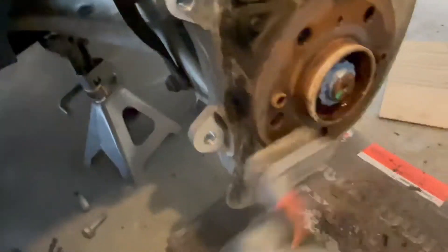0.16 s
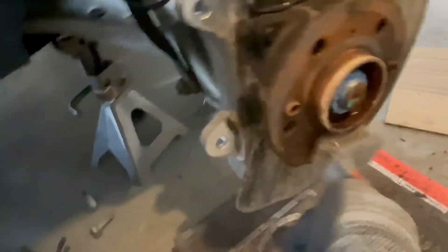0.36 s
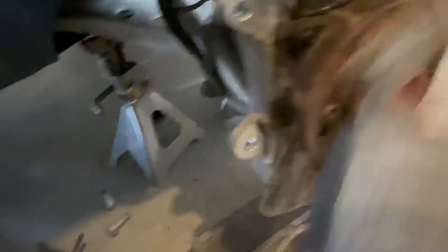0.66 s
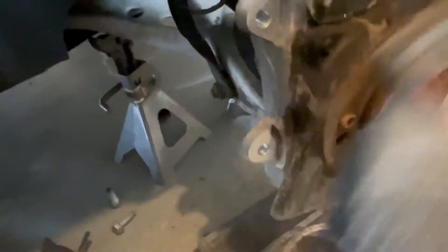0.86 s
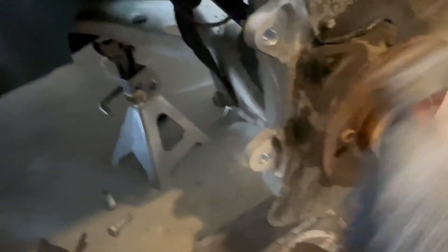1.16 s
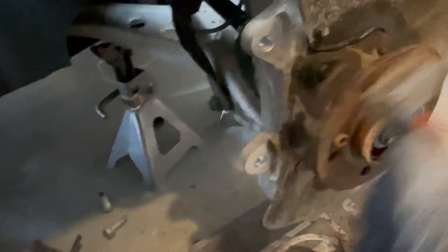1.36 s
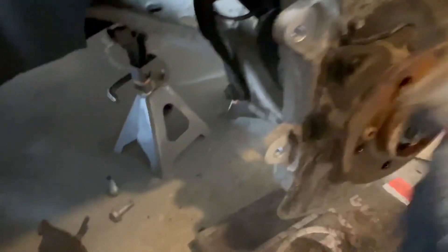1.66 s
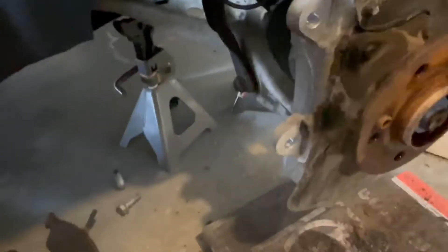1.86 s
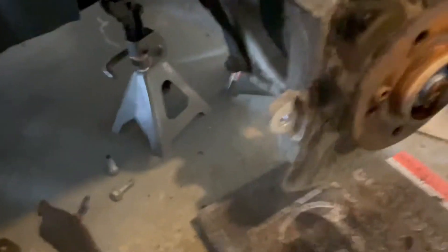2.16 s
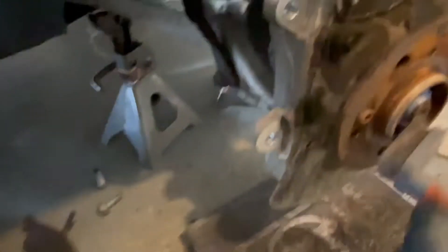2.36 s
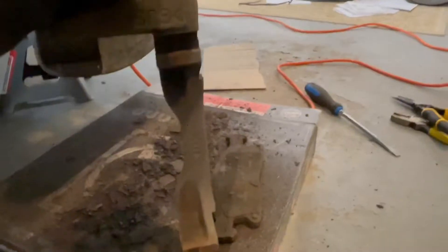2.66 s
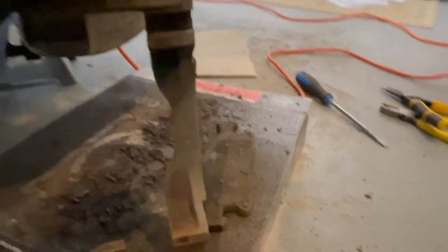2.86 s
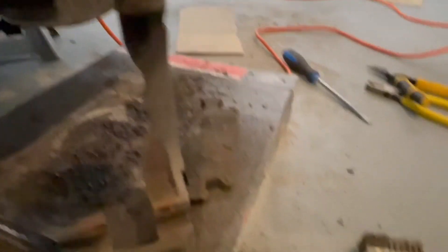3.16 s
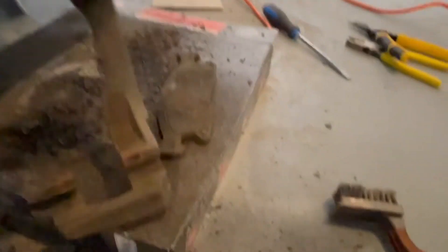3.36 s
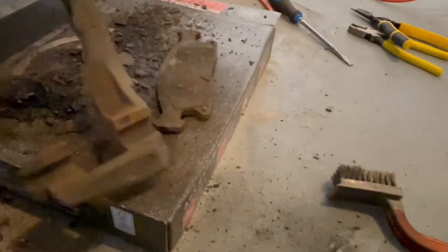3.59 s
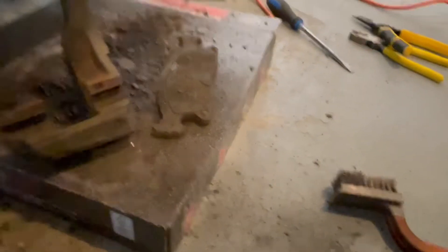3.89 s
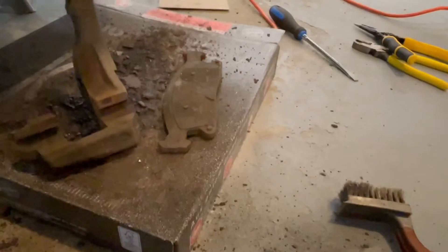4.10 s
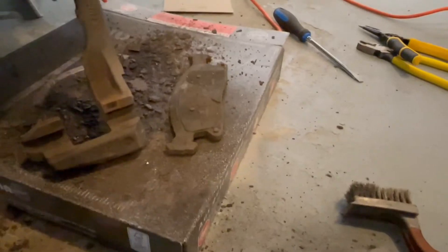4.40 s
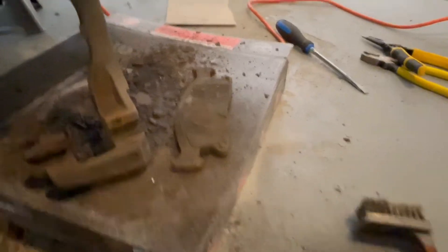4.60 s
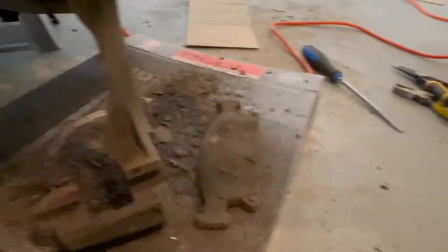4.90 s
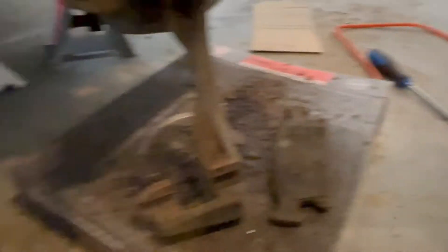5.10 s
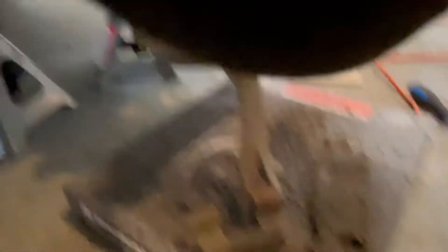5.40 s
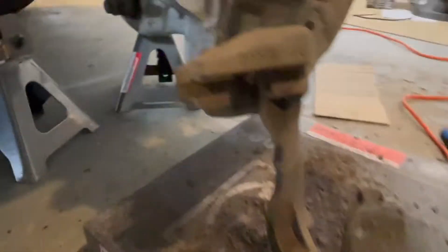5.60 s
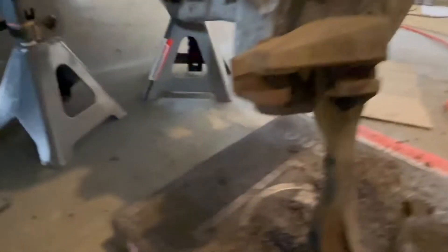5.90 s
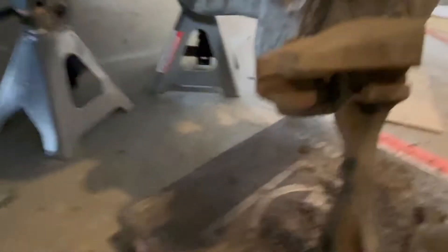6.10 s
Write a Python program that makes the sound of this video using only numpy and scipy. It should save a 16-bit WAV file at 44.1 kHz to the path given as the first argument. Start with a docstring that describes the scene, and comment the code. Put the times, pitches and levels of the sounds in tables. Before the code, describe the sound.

Fast bristly scrubbing makes rusty metal sing thinly, then a sudden cut to iron clattering, dragging and thudding over a hollow box in a garage.

```python
"""A garage: a wire brush scrubs a rusty wheel hub in quick strokes, and the hub sings in thin high modes.
At 2.478 s we are at once closer to the floor: an iron bracket clatters, drags and clunks on a gritty box.
Brush and grit are shaped noise with uneven clicks; hub, box and bracket are sums of decaying modes.
Both spots are heard in stereo over the low rumble and hum of the building."""
import sys
import numpy as np
from scipy import signal
from scipy.fft import rfft, irfft, next_fast_len
from scipy.io import wavfile
from scipy.ndimage import uniform_filter1d

SR = 44100
rng = np.random.default_rng(int(sys.argv[2]) if len(sys.argv) > 2 else 0)


def wav_out(sig):
    """Save sig, one row per channel (or a flat mono array), as 16-bit PCM at SR to the path in sys.argv[1]."""
    wavfile.write(sys.argv[1], SR, np.round(np.clip(np.atleast_2d(sig).T, -1, 1) * 32767).astype(np.int16))


N = 275624
PAD = next_fast_len(N, True)
T = np.arange(N) / SR  # time, s
F = np.fft.rfftfreq(PAD, 1 / SR)  # frequency bins, Hz

# slow course of the building noise: t/s, rumble level/dB, hum level/dB
BUILDING = [(0, -50.5, -51.5), (.9, -49.5, -58), (1.3, -52, -60), (2.4, -51, -64), (2.6, -46, -61.5),
            (3.3, -50, -58.5), (3.95, -39, -57), (4.2, -45.5, -48.5), (4.9, -48.5, -47), (5.6, -50, -52.5),
            (6.25, -50, -56.5)]


def undb(db):
    """Amplitude ratio of a level in dB."""
    return 10 ** (np.asarray(db) / 20)


def unit(x):
    """Scales to rms 1."""
    return x / np.sqrt(np.mean(x ** 2))


def white():
    """White noise of rms near 1 over the whole scene."""
    return rng.standard_normal(N)


def over_hz(table):
    """A (f/Hz, value) table on every frequency bin, straight on a log axis."""
    hz, value = np.transpose(table)
    return np.interp(np.log(F + 1), np.log(hz + 1), value)


def over_time(table):
    """Each column of a timed table, straight between its points."""
    s, *columns = np.transpose(table)
    return [np.interp(T, s, c) for c in columns]


def colour(x, table):
    """Shapes a spectrum; white noise of rms 1 keeps rms 1."""
    return irfft(rfft(x, PAD) * unit(undb(over_hz(table))), PAD)[..., :N]


def ring(x, hz, t60):
    """One decaying mode; a unit push rings with amplitude 1."""
    pole = np.exp(2j * np.pi * hz / SR - np.log(1000) / (t60 * SR))
    return signal.lfilter([1], [1, -pole], x).imag


def grains(rate, spread_db, smooth):
    """Random clicks of very uneven size, about rate per s, over a smooth hiss; rms 1."""
    biggest = 3  # the largest click, in spreads above the smallest
    size_db = spread_db * np.minimum(rng.exponential(size=N), biggest)
    size = undb(size_db) * (rng.random(N) < rate / SR)
    clicks = unit(size * white())
    return unit(clicks + smooth * white())


def walk(rate):
    """A wandering level: about rate random values per s joined by straight slopes, spread near 1."""
    k = int(SR / rate)
    steps = np.repeat(rng.standard_normal(N // k + 1), k)
    return unit(uniform_filter1d(steps, k))[:N]


def arches(s, rise, fall, db, edge_db, power):
    """Summed swells: each peaks at s and is edge_db down one rise time before and one fall time after."""
    s, rise, fall, db = (np.reshape(c, (-1, 1)) for c in (s, rise, fall, db))
    t = T[::32]  # a coarse clock is enough for slow swells
    away = np.where(t < s, (s - t) / rise, (t - s) / fall)
    return np.interp(T, t, undb(db - edge_db * away ** power).sum(axis=0))


def pushes(s, db):
    """Single-sample impulses at the times s."""
    x = np.zeros(N)
    x[(np.asarray(s) * SR).astype(int)] = undb(db)
    return x


def crack(s, db, t60, tail_db=-16, tail_t60=0.14, edge=1.07):
    """Each push is a sharp edge, a burst of noise that dies quickly and a short tail off the floor."""
    push = pushes(s, db)
    burst, tail = (signal.lfilter([1], [1, -undb(-60 / (t * SR))], push) for t in (t60, tail_t60))
    return edge * push + (burst + undb(tail_db) * tail) * white()


def struck(modes, s, db, centre_hz, octaves, hold=0.56, soft=0.0012, detune=0.0061):
    """One blow: modes near its strongest pitch ring most, at slightly random level, pitch and phase."""
    t = np.arange(int((hold + .05) * SR)) / SR
    hz, mode_db, t60 = (c[:, None] for c in np.transpose(modes))
    chance = rng.standard_normal((3, len(modes), 1))
    off_centre = np.log2(hz / centre_hz) / octaves
    gain = undb(db + mode_db + 2 * chance[0] - 6 * off_centre ** 2)
    phase = 2 * np.pi * hz * (1 + detune * chance[1]) * t + chance[2]
    wave = (gain * np.sin(phase) * undb(-60 * t / t60)).sum(axis=0)
    onset = 1 - np.exp(-t / soft)  # a softer contact starts slower
    damping = undb(-60 * np.maximum(t - hold, 0) / 0.021)  # choked after hold s
    out, i = np.zeros(N), int(s * SR)
    out[i:i + len(t)] = (wave * onset * damping)[:N - i]
    return out


def air():
    """Faint steady hiss of the garage: shaped white noise."""
    # spectrum: f/Hz, level/dB
    air_tone = [(800, 31), (1500, -15), (4000, -7), (9000, -36), (15500, 8)]
    return undb(-77) * colour(white(), air_tone)


def rumble():
    """Low rumble of the building: shaped noise whose level wavers."""
    # spectrum: f/Hz, level/dB per Hz
    rumble_tone = [(15, -35), (25, -17), (64, 2.5), (109, 4), (141, -6.5), (167, -3.5), (209, -9.5),
                   (476, -25), (528, -20.5), (852, -24), (928, -26.5), (1500, -36), (1950, -41),
                   (3300, -120)]
    rumble_db = over_time(BUILDING)[0] + 0.9 * walk(4)
    return undb(rumble_db) * unit(colour(white(), rumble_tone))


def hum():
    """Narrow mains hum: noise through one sharp resonance."""
    hum_db = over_time(BUILDING)[1]
    return undb(hum_db) * unit(ring(white(), hz=119.37, t60=1.0))


def bumps():
    """Dull bumps that reach the camera body: one low mode each, softly started."""
    # t/s, level/dB, f/Hz, t60/s
    bump_list = [(0.448, -7, 83, 0.091), (0.463, -23.5, 58, 0.32), (0.803, -7, 77, 0.064),
                 (0.851, -24, 56, 0.22), (4.061, -27, 53.5, 0.52), (5.127, -24, 61, 0.16),
                 (5.154, -13, 50.3, 0.055)]
    return sum(struck([(hz, 0, t60)], s, db, hz, 1, soft=0.025) for s, db, hz, t60 in bump_list)


def slide():
    """Rust grit and a sleeve rub over the cardboard: uneven clicks in three bands over a dull noise."""
    # rubs: loudest at t/s, rise/s, fall/s, grit level/dB, rustle level/dB, top level/dB, cardboard level/dB
    rubs = [(2.61, 0.23, 0.12, -70, -70, -73, -67), (3.0, 0.48, 0.46, -56, -58.5, -62, -51.5),
            (3.012, 0.012, 0.049, -68, -51, -65, -67), (3.2, 0.081, 0.18, -69, -66, -67, -52.5),
            (3.36, 0.064, 0.2, -43, -49.5, -64, -37), (3.6, 0.083, 0.16, -43, -50.5, -73, -27.5),
            (3.75, 0.097, 0.14, -40.5, -48, -78, -25.5), (3.98, 0.12, 0.28, -49.5, -67, -87, -35),
            (4.13, 0.18, 0.25, -43.5, -48.5, -55, -34), (4.37, 0.026, 0.14, -67, -88, -94, -62),
            (4.49, 0.015, 0.1, -74, -66, -64, -58), (4.7, 0.76, 0.66, -57, -65.5, -67.5, -58.5),
            (4.88, 0.24, 0.075, -60.5, -82, -84, -77), (5.098, .04, .04, -65.5, -89, -85.5, -68),
            (5.15, 0.039, 0.045, -58, -63.5, -67, -51.5), (5.298, 0.14, 0.15, -65, -72, -69, -81),
            (5.491, 0.022, .03, -62.5, -70, -54, -60), (5.529, 0.096, 0.042, -52.5, -49, -49, -57),
            (5.62, 0.27, 0.37, -64, -72.5, -77, -66), (5.76, 0.18, 0.21, -69.5, -80, -78, -64.5),
            (5.86, 0.045, 0.034, -75, -74, -68, -64), (5.921, 0.087, 0.12, -66, -69, -61.5, -65.5),
            (6.11, 0.13, 0.14, -66.5, -71.5, -71, -63), (6.2, 0.12, 0.1, -64, -60.5, -59.5, -53.5)]
    # spectra of grit, rustle, top and cardboard: f/Hz, level/dB
    grit_tone = [(900, -0.5), (1600, 5.5), (2700, 9), (3600, 4.5), (4600, -17), (6500, -39), (8000, -46)]
    rustle_tone = [(2500, -43), (3800, 5), (5500, 6.5), (6800, 2.5), (7800, -17)]
    top_tone = [(5500, -30), (8000, 0), (12000, -4), (15800, -7)]
    card_tone = [(120, -26), (220, 4), (450, 1.5), (800, -4.5), (1300, -8.5), (2200, -35)]
    *when, grit_db, rustle_db, top_db, card_db = np.transpose(rubs)
    grit_level, rustle_level, top_level, card_level = (
        arches(*when, db, edge_db=27.5, power=1.16) for db in (grit_db, rustle_db, top_db, card_db))
    clicks = undb(2.6 * walk(30)) * grains(2500, 1.7, 1.14)
    grit = grit_level * colour(clicks, grit_tone)
    rustle = rustle_level * colour(clicks, rustle_tone)
    top = top_level * colour(clicks, top_tone)
    card = card_level * undb(0.5 * walk(25)) * colour(white(), card_tone)
    return grit + rustle + top + card


def box_blows():
    """The box booms in its own modes under soft blows, each with a dead low thud just behind it."""
    # blows: t/s, level/dB, strongest f/Hz, thud above it/dB
    blows = [(3.307, -22, 780, 5), (3.348, -30.5, 440, -6.5), (3.538, -23.5, 714, 10),
             (3.585, -16, 417, -7), (3.604, -14.5, 496, -15), (3.628, -11, 280, -5), (3.66, -13.5, 286, 0),
             (3.71, -8, 348, 2), (3.734, -5, 360, 1), (3.742, -9, 240, 3), (3.761, -11.5, 199, -1),
             (3.779, -19, 380, -3), (3.793, -10.5, 422, 4), (3.808, -26, 400, -5), (3.833, -19, 346, -4),
             (3.85, -26.5, 170, -13), (3.932, -17, 353, 8), (3.959, -12, 195, -5), (4.009, -13.5, 326, 9),
             (4.028, -16.5, 295, -2), (4.06, -30, 300, 0), (4.086, -18, 198, -10), (4.139, -22.5, 202, -1),
             (4.18, -23, 198, -2), (4.255, -45, 195, -8), (4.334, -41, 211, -11), (4.362, -39, 188.5, -14),
             (4.407, -43, 205, -5), (5.113, -39.5, 318, -9), (5.281, -45, 547, 9)]
    # modes of the box: f/Hz, level/dB, t60/s
    box_modes = [(156.3, -4.5, 0.093), (198, 3, 0.061), (242, -5, 0.12), (331, -4.5, 0.063),
                 (359, 0.5, 0.049), (395.7, -1, 0.064), (493, -4, 0.097), (658, -4, 0.07), (810, -8, 0.06)]
    thud_t60, thud_late = 0.011, 0.00293  # s
    out = np.zeros(N)
    for s, db, hz, thud_db in blows:
        out += struck(box_modes, s, db, hz, 0.75, hold=.25, soft=0.0055)
        thud_mode = [(1.107 * hz, thud_db, thud_t60)]
        out += struck(thud_mode, s + thud_late, db, hz, 4, hold=.03, soft=0.00098)
    return out


def minor_modes(count=44):
    """Unevenly spaced weak modes of the cast bracket: f/Hz, level/dB, t60/s."""
    chance = rng.standard_normal((count, 3)).T
    hz = np.linspace(880, 4050, count) * (1 + 0.019 * chance[0])
    return np.column_stack([hz, -23 + 4 * chance[1], .15 * undb(1.3 * chance[2])])


def garage_echo(dry_sound):
    """Floor and walls answer: the sound convolved with a short decaying noise."""
    t = T[:SR // 4]
    echo = rng.standard_normal(SR // 4) * undb(-60 * t / .2)  # t60 .2 s
    return undb(-16) * signal.fftconvolve(dry_sound, echo / np.linalg.norm(echo))[:N]


def bracket(minor):
    """The iron bracket rings in many modes until it is gripped or lands, and the garage answers."""
    # strikes: t/s, level/dB, strongest f/Hz, spread/octaves, until gripped or landed/s
    strikes = [(3.295, -30.5, 1560, 1.5, 0.026), (3.31, -29, 1130, 0.95, 0.025),
               (3.541, -28.5, 985, 1.95, 0.016), (3.585, -32, 650, 0.2, 0.03),
               (3.612, -12, 640, 0.15, 0.025), (3.63, -32, 800, 0.23, 0.02), (3.717, -29, 700, 0.34, 0.058),
               (3.733, -22, 790, 0.2, 0.043), (3.741, -24, 510, 0.2, 0.036), (3.79, -30, 800, 0.33, 0.014),
               (3.931, -21, 1000, 2.2, .152), (3.933, -27, 2700, .6, .07), (4.012, -24, 300, .8, .13),
               (4.086, -19, 1005, .15, .058), (4.088, -24, 3000, .2, .04), (4.089, -28, 3750, .15, .04),
               (4.09, -30, 1700, .4, .08), (4.15, -29, 215, .4, .6), (4.2, -33, 620, .15, .35),
               (4.14, -34, 3700, .12, .15), (4.245, -36, 1400, .4, .025), (4.255, -29, 1078, .08, .1),
               (4.366, -42, 2000, .3, .012), (4.262, -31, 2350, .15, .05), (4.27, -40, 3700, .3, .035),
               (4.278, -28, 1350, .15, .09), (4.366, -43, 760, .4, .014), (4.402, -36, 1350, .15, .08),
               (4.397, -40, 2340, 0.33, 0.054), (4.399, -42, 3650, 0.27, 0.022),
               (4.42, -37, 553, 0.12, .22), (4.238, -40, 2400, .5, .03), (4.478, -45, 3700, 0.27, .02),
               (5.281, -36.5, 2940, 0.56, .002), (5.284, -37, 634, 0.22, 0.0038)]
    # strong modes: f/Hz
    iron_hz = [199, 243, 318, 362, 398, 468, 512, 559, 620, 655, 711, 789, 856, 1005, 1078, 1133, 1346,
               1389, 1563, 1640, 1673, 1707, 1879, 2067, 2218, 2340, 2417, 2560, 2635, 2688, 2782, 2961,
               3310, 3560, 3700, 3800, 3950]
    # of each strong mode: level/dB, t60/s
    iron_decay = [(-1.5, 0.87), (-8, 1.71), (-19, 0.19), (-3, 0.1), (-2, 0.15), (-10, 1), (-24, 0.16),
                  (-13.5, 0.3), (-20, 1.34), (-10.5, 0.5), (-8, 0.13), (-2.5, 0.63), (-14, 0.29),
                  (-11.5, 0.85), (-20, 0.16), (-23, 0.26), (-13.5, 0.25), (-14, 0.16), (-13.5, 0.46),
                  (-26, 0.2), (-15, 0.3), (-25, 0.17), (-26, 0.15), (-16.5, 0.28), (-11.5, 0.064),
                  (-10.5, 0.14), (-17, 0.1), (-14.5, 0.14), (-18, .2), (-20.5, 0.36), (-13.5, 0.25),
                  (-14, 0.075), (-30, 0.13), (-15, 0.0595), (-14, 0.083), (-20, 0.077), (-30, 0.068)]
    modes = np.vstack([np.column_stack([iron_hz, iron_decay]), minor])
    iron = sum(struck(modes, *strike, detune=0.004) for strike in strikes)
    return iron + garage_echo(iron)


def ticks():
    """Iron on iron: each tick is a bright crack, a duller middle, a top edge and a short knock below."""
    # t/s, level/dB, top edge above it/dB, knock above it/dB
    tick_list = [(2.9435, -55, -10, 11), (2.982, -52, 5, 3), (3.036, -30, -2, -9), (3.123, -49, 12, -2),
                 (3.13, -50, 4, -14), (3.197, -34.5, 4.5, -10), (3.2957, -24.5, 5, -4),
                 (3.3088, -23, -11, 1), (3.312, -36, -10, -6), (3.3303, -31, 2, -2), (3.3517, -31, 14, 0),
                 (3.36, -26, 7, -15), (3.366, -33, -8, -9), (3.3824, -20, 5.5, -19), (3.399, -37, 11, -7),
                 (3.407, -41, -12, -8), (3.4193, -25.5, 1, -17), (3.4454, -38, -8, -5),
                 (3.5412, -37, -30, 3.5), (3.5698, -35, 1, -2.5), (3.59, -31, -5, -6),
                 (3.6126, -25.5, 1, -14), (3.6278, -33, -11, 0.5), (3.635, -33.5, -17, 3),
                 (3.718, -40, 2, 9.5), (3.73, -23.5, 0, -6.5), (3.7507, -33, 8, 0),
                 (3.7937, -30.5, 6.5, -16), (3.837, -45, 4, -1), (3.932, -34.5, -15, 5.5),
                 (4.011, -22, 2, -15), (4.0325, -25.5, 6.5, -9), (4.065, -41, -12, 13),
                 (4.0875, -37, -21, 4), (4.1678, -27.5, 0, -5.5), (4.2592, -48, 5, 2), (4.366, -60, 3, 8.5),
                 (4.398, -65, -6, 4), (5.086, -68, -11.5, -13), (5.119, -60, -10, 1),
                 (5.1672, -51.5, 12, -18), (5.244, -67, 6, -10), (5.2817, -54, -32, -6),
                 (5.3173, -59, 2, -15), (5.376, -67, -15, -4), (5.724, -69, -10, -11),
                 (5.8488, -60, -3, -17), (5.904, -65, 24, -12), (5.92, -57, 12, -17), (5.954, -65, 20, -14),
                 (6.098, -68, -7.5, -10), (6.19, -59, -4, -13)]
    # spectra of crack, middle, top edge and knock: f/Hz, level/dB
    bright_tone = [(3200, -25), (4600, -3), (5600, 0), (7000, -5), (8500, -8), (10500, -25)]
    middle_tone = [(1400, -19), (2100, 4.5), (2700, 4), (3600, 4.5), (4800, -46)]
    edge_tone = [(6500, -25), (8500, -2), (10000, 0), (13000, -2), (15800, -3)]
    knock_tone = [(250, -9), (600, 3.5), (1100, 2), (1600, -1), (2400, -21)]
    s, db, top_db, knock_db = np.transpose(tick_list)
    middle_db = -1 + 0.66 * knock_db  # heavier ticks are fuller in the middle too
    bright = colour(crack(s, db, 0.0069, tail_db=-19.5), bright_tone)
    middle = colour(crack(s, db + middle_db, 0.013, edge=3.3), middle_tone)
    top = colour(crack(s, db + top_db, 0.0043, tail_db=-22.0), edge_tone)
    knock = colour(crack(s, db + knock_db, 0.069), knock_tone)
    return bright + middle + top + knock


def contact():
    """Gain of the brush on the rust: it sinks while the brush lifts and is back at once when it lands."""
    # starts to lift t/s, lands t/s, drop level/dB
    lifts = [(0.498, 0.576, -12), (1.838, 1.888, -9), (1.96, 2.015, -9.5)]
    return undb(sum(db * np.clip((T - lift) / (land - lift), 0, 1) * (T < land) for lift, land, db in lifts))


def hub_modes(wires):
    """The hub sings: the wire clicks feed its modes, now well, now badly, as the brush wanders."""
    # modes of the hub: f/Hz
    hub_hz = [1400, 3100, 4610, 5098, 5135, 5172, 6480, 7262, 7320, 9478, 12220, 12980]
    # of each mode: level/dB, t60/s, fade/dB per s as the brush leaves the spot where it rings best
    hub_decay = [(-43.5, 0.19, 0), (-60, 0.19, 0), (-46, 0.088, 2), (-47, 0.063, 4), (-34.5, 0.17, 3),
                 (-35.5, 0.17, 2), (-55, 0.13, 2), (-24.5, 0.17, 11), (-35, 0.14, 9), (-24.5, 0.21, 21),
                 (-40, 0.27, 20), (-47, .12, 20)]
    out = np.zeros(N)
    for hz, (db, t60, fade_db) in zip(hub_hz, hub_decay):
        feed_db = db + 5.55 * walk(10) - fade_db * T
        out += ring(wires * undb(feed_db), hz, t60)
    return out


def wire_tufts(wires):
    """The bent wire tufts ring briefly, each fed patchily by the clicks."""
    # rings of the tufts: f/Hz
    tuft_hz = [1983, 2380, 3090, 3390, 3550, 3930, 4220, 4500, 6200]
    return sum(ring(wires * undb(-45.5 + 5 * walk(14)), hz, t60=0.094) for hz in tuft_hz)


def hollow_note():
    """A hollow note swells once: noise through one broad resonance."""
    swell = arches(1.56, .17, .12, -48, edge_db=8.0, power=3.9)
    return swell * unit(ring(white(), hz=628, t60=0.044))


def brush():
    """Hundreds of wire tips catch and slip in strokes; their clicks also feed the hub and the tufts."""
    # strokes: loudest at t/s, rise/s, fall/s, bristle level/dB, low scrape level/dB, middle rasp level/dB
    strokes = [(-.01, .05, 0.03, -44, -50, -62), (0.121, 0.14, 0.12, -42, -50, -53.5),
               (0.257, 0.053, 0.074, -39, -53.5, -50), (0.413, 0.12, 0.086, -41.5, -51, -47.5),
               (0.53, .08, 0.059, -67.5, -66, -69), (0.589, 0.0048, 0.059, -58, -77, -58),
               (0.662, 0.079, 0.13, -37.5, -47.5, -45.5), (0.844, 0.076, 0.057, -39, -52, -48.5),
               (.98, 0.098, 0.13, -38.5, -51, -50), (1.159, 0.088, 0.082, -39.5, -49.5, -50.5),
               (1.326, 0.094, 0.14, -37.5, -46.5, -41.5), (1.545, 0.1, 0.062, -44.5, -48.5, -51.5),
               (1.684, 0.099, 0.071, -36.5, -45.5, -49.5), (1.806, 0.085, 0.065, -49, -52.5, -66.5),
               (1.919, 0.066, 0.045, -52, -58, -72), (1.985, .05, 0.045, -66, -62, -79),
               (2.022, 0.0076, 0.045, -60, -61, -75), (2.075, 0.048, 0.086, -45, -56, -76),
               (2.212, 0.099, 0.076, -41, -48, -52), (2.352, 0.083, 0.077, -44.5, -52.5, -54.5),
               (2.467, 0.093, 0.059, -50.5, -57.5, -56)]
    # single wires snapping free: t/s, level/dB
    snaps = [(0.214, -36.5), (0.596, -43), (0.625, -30), (0.655, -52), (0.963, -41), (1.0939, -48),
             (1.265, -44), (1.634, -46), (1.684, -35), (1.803, -36.5), (1.891, -43.5), (2.0164, -50),
             (2.1919, -46), (2.3208, -42.5)]
    # spectra of bristles, their top, rasp and low scrape: f/Hz, level/dB
    bristle_tone = [(900, -32), (1800, -3), (3000, -8), (5500, 4.5), (7500, 7.5), (9500, 2.5),
                    (12000, -15.5)]
    bristle_top_tone = [(7000, -59), (9500, -5), (12000, -1.5), (15500, -1)]
    rasp_tone = [(1800, -19), (2700, -6), (3500, 1), (4400, -3.5), (5800, -23)]
    scrape_tone = [(150, 9), (350, -1), (700, 5.5), (1400, 4.5), (2400, 3.5), (4000, -85)]
    *when, bristle_db, scrape_db, rasp_db = np.transpose(strokes)
    stroke_round = 2.48  # power of each arch; edge_db is the drop where the brush turns
    tips = contact() * undb(2.3 * walk(59.27)) * grains(5000, 3.0, 0.94)
    wires, rasp = (arches(*when, db, 25, stroke_round) * tips for db in (bristle_db, rasp_db))
    wires = wires + crack(*np.transpose(snaps), 0.012, edge=.5)
    hiss = colour(wires, bristle_tone) + undb(-4) * colour(wires, bristle_top_tone)
    scrape_level = contact() * arches(*when, scrape_db, 15.5, stroke_round)
    scrape = scrape_level * colour(grains(1500, 2.8, 1.4), scrape_tone)
    singing = hub_modes(wires) + wire_tufts(wires) + hollow_note()
    return hiss + colour(rasp, rasp_tone) + scrape + singing


def stereo(source, phase, common, left):
    """Common sound with a phase step, plus an independent draw of it left and right, which widens it."""
    shared, *own = rfft([source() for _ in range(3)], PAD)  # three draws of the same events
    side = np.array([[.5], [-.5]])  # left, right
    share = np.clip(over_hz(common), 0, 1)
    shared = shared * np.exp(1j * side * np.interp(F, *np.transpose(phase)))
    mixed = np.sqrt(share) * shared + np.sqrt(1 - share) * np.array(own)
    return irfft(undb(side * over_hz(left)) * mixed, PAD)[:, :N]


def scene():
    """The hub first, then at once the box and bracket; hum and bumps are alike left and right."""
    # phase of left against right: f/Hz, phase/rad
    phase_hub = [(0, 0), (600, 0), (1700, -1.2), (3600, 0), (5000, -3.1), (6300, -6.3), (7550, -9.4),
                 (8950, -9.45), (10500, -12.5), (12600, -12.6), (13900, -15.7), (16500, -15.72)]
    phase_box = [(0, 0), (850, 0), (1300, 3), (4900, 0), (8200, -3.1), (9000, -3.4), (11800, -6.2),
                 (13500, -6.4), (16500, -9.3)]
    # share of power common to left and right: f/Hz, share (0 to 1)
    common_hub = [(100, 0.93), (300, 0.55), (1400, 0.32), (5000, 0.25), (6800, 0.12), (7600, 1), (8950, 1),
                  (9700, 0.12), (10700, 1), (12400, 0.67), (13100, 0.41), (13900, 1)]
    common_box = [(500, 1), (750, 0.21), (1200, 0.29), (4000, 0.2), (5800, 0.11), (7600, 1), (9000, 1),
                  (10500, 1), (11700, 0.86), (13500, 1), (15000, .7)]
    common_hits = [(200, 1), (500, 1), (750, 1), (1200, 0.45), (4000, 0.65), (6000, 0.97), (7600, 1),
                   (10500, 0.72), (15000, 0.95)]
    # left minus right: f/Hz, level/dB
    left_hub = [(60, -1), (110, 2), (200, 1.5), (380, 2), (700, 2.5), (1290, 1.5), (2380, 0), (4400, 1),
                (7400, 0), (15000, 0)]
    left_box = [(400, 0), (700, 1), (1290, 2.1), (2380, -.5), (4400, .8), (8120, 0)]
    at_hub = stereo(lambda: brush() + rumble() + air(), phase_hub, common_hub, left_hub)
    rubbing = stereo(lambda: slide() + rumble() + air(), phase_box, common_box, left_box)
    minor = minor_modes()  # one bracket, the same in every draw
    hits = stereo(lambda: ticks() + box_blows() + bracket(minor), phase_box, common_hits, left_box)
    change = 2.478  # s, the place changes abruptly
    return np.where(T < change, at_hub, rubbing + hits) + hum() + bumps()


def record(dry):
    """The camera cuts the top steeply above 15750 Hz."""
    return signal.sosfilt(signal.ellip(8, .2, 60, 15750, fs=SR, output="sos"), dry)


dry = scene()
out = record(dry)
wav_out(out)
```